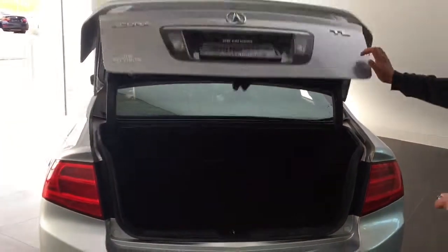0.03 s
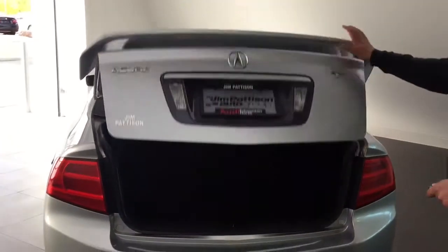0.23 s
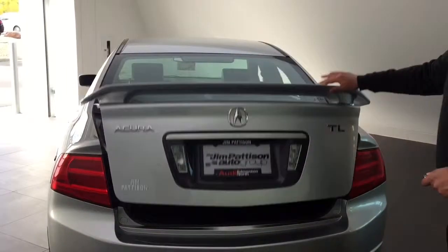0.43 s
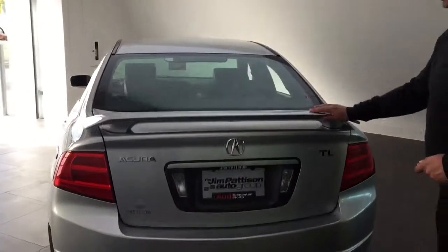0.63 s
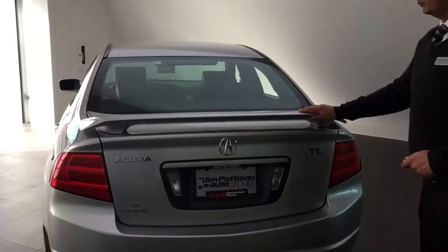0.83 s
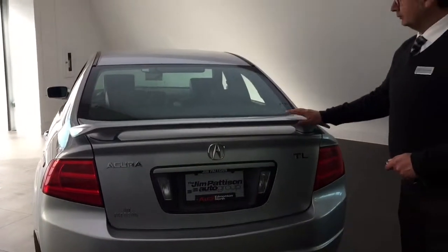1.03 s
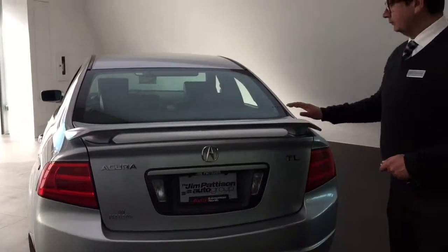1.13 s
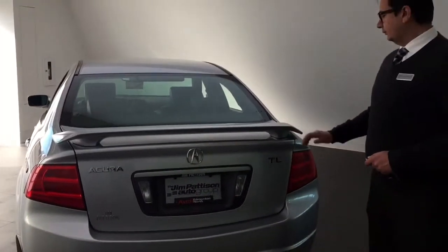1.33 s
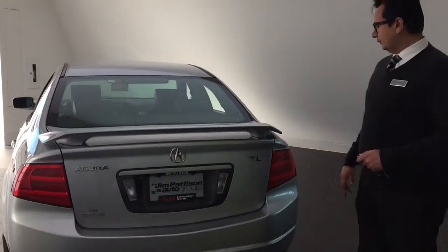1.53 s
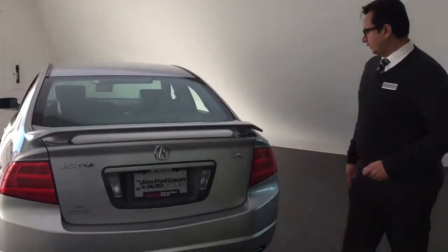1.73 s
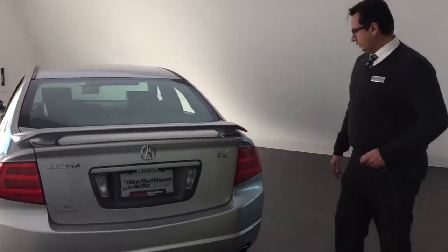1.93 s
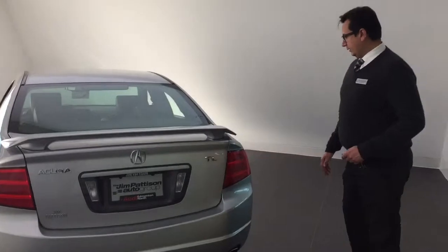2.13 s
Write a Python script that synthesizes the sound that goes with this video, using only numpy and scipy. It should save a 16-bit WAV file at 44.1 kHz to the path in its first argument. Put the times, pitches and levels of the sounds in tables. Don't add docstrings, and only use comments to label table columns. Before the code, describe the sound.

Car boot pushed closed by hand: soft hinge knocks, hard latch slam, short roomy echo

```python
import sys
import numpy as np
from scipy import signal
from scipy.fft import rfft, irfft
from scipy.io import wavfile

SR = 44100
rng = np.random.default_rng(int(sys.argv[2]) if len(sys.argv) > 2 else 0)


def boost(x):
    u = np.asarray(x, float) / 20
    return 10 ** u


def master(y):
    cut = np.clip(np.atleast_2d(y).T, -1, 1)
    pcm = np.round(cut * 32767)
    wavfile.write(sys.argv[1], SR, pcm.astype(np.int16))


N = 96138

# pitch_hz, level_db (per Hz)
AIR_COLOUR = [(25, -25), (60, -18), (130, -7), (230, -13.5), (420, -31.5), (860, -12), (2000, -21.5),
              (3000, -46), (6000, -52), (16000, -58.5)]
AIR_DB = -46
# time_s, level_db
AIR_SWELL = [(0, 1), (.3, 0.5), (.6, 0.5), (1.2, -.5), (1.6, 2.5), (1.9, .5), (2.18, 0)]
# pitch_hz, width_hz, level_db
DUCTS = [(54.3, 39, -54.5), (2070, 12, -68), (997, 58, -77.5)]
# time_s, pitch_hz, level_db
DRONE = [(0, 140.8, -50.5), (.15, 150, -53.5), (.28, 139.2, -59), (.42, 144.9, -52), (.6, 142, -53),
         (1.08, 142.8, -46.5), (1.152, 150, -47), (1.269, 150, -45.5), (1.32, 132.7, -45),
         (1.37, 148.9, -45.5), (1.42, 160.6, -52.5), (1.47, 147.6, -46.5), (1.56, 120.5, -50.5),
         (1.64, 166.1, -60), (1.72, 141, -44), (1.88, 141.4, -52), (2.05, 148.8, -48), (2.18, 139, -52)]
BAND_EDGES_HZ = 22 * 2 ** np.arange(0, 9.6, 1 / 3)
# pitch_hz, t60_s (time to fade by 60 dB), echo_db (energy)
ROOM = [(50, 0.79, -9), (150, 1, -2), (390, 0.97, -3.5), (980, 1, -7), (2400, 0.92, -5.5), (4800, .75, -5),
        (8000, 0.52, -5), (14000, 0.31, -14.5)]
ROOM_GAP_S, ROOM_FILL_S = 0.0069, 0.011
RING_SEND_DB, SMALL_SEND_DB = -9, -9
# start_s, attack_s, hold_s, t60_s, level_db
SLEEVE = (.378, .022, .065, .2, -62)
SHOE = (1.682, .022, .05, .35, -53.5)
GRIT = (1.818, .006, .055, .15, -62)
# pitch_hz, level_db (per Hz)
SLEEVE_COLOUR = [(520, 7), (750, -4), (1500, -25), (3000, 5), (6000, -1), (9500, -4), (11000, -4),
                 (15500, -17)]
SHOE_COLOUR = [(1500, -10), (2800, -1), (4500, -2), (7000, -6), (10500, -10), (13000, -6), (15500, -4)]
GRIT_COLOUR = [(3000, -5), (6000, -3), (10000, -1), (15500, -5)]
# time_s, level_db, low_edge_hz
TICKS = [
    (.4675, -48, 9000),
    (1.8228, -20, 5000),
    (1.8253, -27, 4500),
    (1.8275, -39, 8000),
    (1.8295, -37, 7000),
    (1.8355, -38, 8000),
]
# time_s, level_db, pitch_hz, t60_s
KNOCKS = [
    (0.401, -28, 275, 0.024),
    (0.445, -33, 275, 0.084),
    (0.4667, -23.5, 294, 0.13),
    (.467, -32, 228, 0.14),
    (0.509, -33, 306, 0.081),
    (.538, -34, 329.4, 0.16),
    (.627, -36, 235, 0.18),
]
# time_s, crack_db, ring_db
CONTACTS = [(.6645, -19.5, -29), (.669, -16, -16), (.675, -16, -22.5), (.682, -24, -14),
            (0.689, -15, -12.5), (.695, -23, -20.5), (.701, -33.5, -24), (.712, -29, -23),
            (.722, -20.5, -27), (.740, -26.5, -23), (0.7683, -21, -37), (.790, -30, -27)]
# pitch_hz, level_db (per Hz)
CRACK_COLOUR = [(300, -2), (1200, -5), (2510, -7), (4100, -13.5), (5000, -20), (9000, -25.5),
                (13000, -23.5), (16000, -28.5)]
CRACK_T60_S = 0.077
# pitch_hz, level_db, t60_s
PANEL_MODES = [(503, -8, .14), (612, -6, .1), (652, -5, .1), (760, -7, .07), (880, -3, .09), (934, -8, .1),
               (1010, -14, .07), (1250, 1, .07), (1385, -10, .07), (1670, -4, .07), (1890, -9, .05),
               (2250, -8, .05), (2770, -10, .05), (3900, -14, .03)]
# time_s, level_db
PUSHES = [
    (.668, -19),
    (.684, -7),
    (.712, -17),
    (.778, -20),
]
# pitch_hz, level_db, t60_s
BOOM_MODES = [(50, -11.5, .9), (66, -10, .6), (86, -5, 1.2), (115, -8, .9), (132, -10, .5), (170, -18, .3),
              (200, -13, .5), (243, -5, .55), (272, -12, .35), (303, -8, .4), (330, -13, .3),
              (356, -14, .25), (427, -16, .2)]
BOOM_TOP_HZ = 514
SETTLE_S, SETTLE_T60_S = .81, .2
# time_s, level_db, pitch_hz, t60_s
ROCK = (1.055, -36, 65.5, .2)


def rms_one(x):
    return x / np.sqrt(np.mean(x ** 2) + 1e-20)


def at_hz(table, hz, column=1):
    points = np.array(table)
    return np.interp(np.log(hz), np.log(points[:, 0]), points[:, column])


def drift(rate_hz):
    r = np.exp(-80 * np.pi * rate_hz / SR)
    noise = rng.standard_normal(N // 40 + 2002)
    slow = signal.lfilter([1], [1, -2 * r, r * r], noise)[2000:]
    return np.interp(np.arange(N) / 40, np.arange(len(slow)), rms_one(slow))


def filtered(x, edge_hz, kind):
    return signal.sosfilt(signal.butter(2, edge_hz, kind, fs=SR, output="sos"), x)


def coloured(white, colour):
    hz = np.maximum(np.fft.rfftfreq(N, 1 / SR), 10)
    below = np.minimum(hz / colour[0][0], 1) ** 2
    return rms_one(irfft(rfft(white) * boost(at_hz(colour, hz)) * below, N))


def noise_bands():
    white = rng.standard_normal((2, N + 8000))
    for k, (low, high) in enumerate(zip(BAND_EDGES_HZ, BAND_EDGES_HZ[1:])):
        yield np.sqrt(low * high), filtered(white[k % 2], [low, high], "band")[8000:]


def strike(times_s, level_db, modes, spread_db):
    out = np.zeros(N)
    luck = rng.standard_normal((len(times_s), 32))
    at = (np.array(times_s) * SR).astype(int)
    for k, (hz, mode_db, t60_s) in enumerate(modes):
        clicks = np.full(N, 1e-18)
        clicks[at] = boost(level_db + mode_db + spread_db * luck[:, k]) * np.sign(luck[:, k + 16])
        r = boost(-60 / (t60_s * SR))
        w = 2 * np.pi * hz / SR
        out += signal.lfilter([0, np.sin(w)], [1, -2 * r * np.cos(w), r * r], clicks)
    return out


def ventilation_and_traffic():
    together = drift(3)
    air = 0
    for hz, band in noise_bands():
        air = air + band * boost(at_hz(AIR_COLOUR, hz) + 1.85 * together + 2.8 * drift(2.7))
    out = boost(AIR_DB) * rms_one(air)
    for hz, width_hz, db in DUCTS:
        r = np.exp(-np.pi * width_hz / SR)
        resonance = [1, -2 * r * np.cos(2 * np.pi * hz / SR), r * r]
        tone = signal.lfilter([1, 0, -1], resonance, rng.standard_normal(N + 8000))[8000:]
        out = out + boost(db + 1.5 * drift(3)) * rms_one(tone)
    return out * boost(np.interp(np.arange(N) / SR, *np.transpose(AIR_SWELL)))


def duct_drone():
    time_s, pitch_hz, level_db = np.transpose(DRONE)
    t = np.arange(N) / SR
    hz = np.interp(t, time_s, pitch_hz) * (1 + 0.026 * drift(14.2))
    level = boost(np.interp(t, time_s, level_db) + 4.3 * drift(36))
    return np.sqrt(2) * level * np.sin(2 * np.pi * np.cumsum(hz) / SR)


def showroom_echo(x):
    t = np.maximum(np.arange(N) / SR - ROOM_GAP_S, 0)
    tail = 0
    for hz, band in noise_bands():
        decay = boost(-60 * t / at_hz(ROOM, hz)) * (1 - np.exp(-t / ROOM_FILL_S))
        decay = decay / np.sqrt(np.sum(decay ** 2))
        tail = tail + band * decay * boost(at_hz(ROOM, hz, column=2))
    return signal.fftconvolve(x, tail)[:N]


def rub(shape, colour, patchy_db):
    start_s, attack_s, hold_s, t60_s, level_db = shape
    t = np.arange(N) / SR - start_s
    swell = np.clip(t / attack_s, 0, 1) ** 2
    release_db = -60 * np.maximum(t - attack_s - hold_s, 0) / t60_s
    level = swell * boost(level_db + release_db + patchy_db * drift(40))
    return level * coloured(rng.standard_normal(N), colour)


def ticks():
    out = np.zeros(N)
    t = np.arange(200) / SR
    for time_s, level_db, low_edge_hz in TICKS:
        snap = ((t == 0) + .4 * rng.standard_normal(200)) * np.exp(-t / .00025)
        click = filtered(snap, low_edge_hz, "high")
        at = int(time_s * SR)
        out[at:at + len(t)] += boost(level_db) * click / np.abs(click).max()
    return out


def hinges():
    out = np.zeros(N)
    for time_s, level_db, pitch_hz, t60_s in KNOCKS:
        out += strike([time_s], level_db, [(pitch_hz, 0, t60_s)], spread_db=0)
    return filtered(out, [200, 400], "band")


def slam_crack():
    time_s, crack_db, _ = np.transpose(CONTACTS)
    hits = np.full(N, 1e-18)
    hits[(time_s * SR).astype(int)] += boost(crack_db)
    fade = signal.lfilter([1], [1, -boost(-60 / (CRACK_T60_S * SR))], hits)
    grains = rng.standard_normal(N) * boost(1.5 * rng.exponential(1, N))
    return coloured(grains, CRACK_COLOUR) * fade


def panel_ring():
    time_s, _, ring_db = np.transpose(CONTACTS)
    return strike(time_s, ring_db, PANEL_MODES, spread_db=2.0)


def lid_boom():
    time_s, push_db = np.transpose(PUSHES)
    damp = boost(-60 * np.maximum(np.arange(N) / SR - SETTLE_S, 0) / SETTLE_T60_S)
    lowest = strike(time_s, push_db, BOOM_MODES[:1], spread_db=1.5)
    others = damp * strike(time_s, push_db, BOOM_MODES[1:], spread_db=1.0)
    rock_s, rock_db, rock_hz, rock_t60_s = ROCK
    rock = strike([rock_s], rock_db, [(rock_hz, 0, rock_t60_s)], spread_db=3.5)
    return filtered(lowest + others + rock, BOOM_TOP_HZ, "low")


def scene():
    sleeve = rub(SLEEVE, SLEEVE_COLOUR, patchy_db=-1.5)
    shoe = rub(SHOE, SHOE_COLOUR, patchy_db=.7) + rub(GRIT, GRIT_COLOUR, patchy_db=1.5)
    small = hinges() + ticks() + sleeve + shoe
    crack = slam_crack()
    ring = panel_ring() + lid_boom()
    echo = showroom_echo(crack + boost(RING_SEND_DB) * ring + boost(SMALL_SEND_DB) * small)
    return (ventilation_and_traffic() + duct_drone() + echo + small + ring + crack)[None]


def low_pass(x):
    return signal.sosfilt(signal.butter(12, 16870, fs=SR, output="sos"), x)


def record(dry):
    x = filtered(dry, 35, "high")
    rounded = .9 * np.tanh(x / .9)
    top_cut = signal.ellip(10, .5, 50, 16100, fs=SR, output="sos")
    return low_pass(signal.sosfilt(top_cut, rounded))


dry = scene()
out = record(dry)
master(out)
```